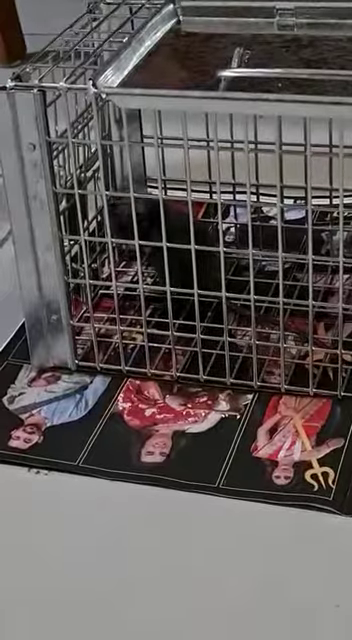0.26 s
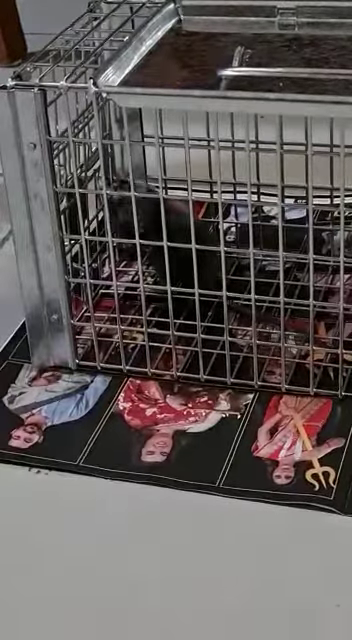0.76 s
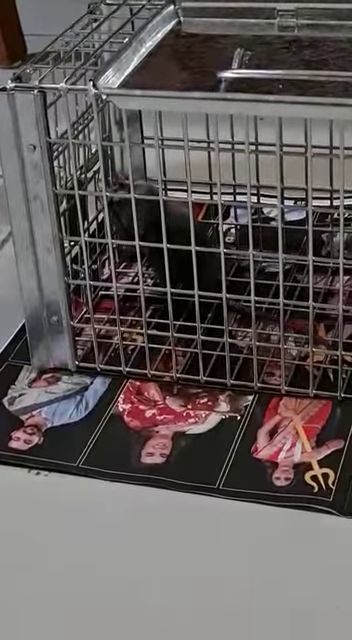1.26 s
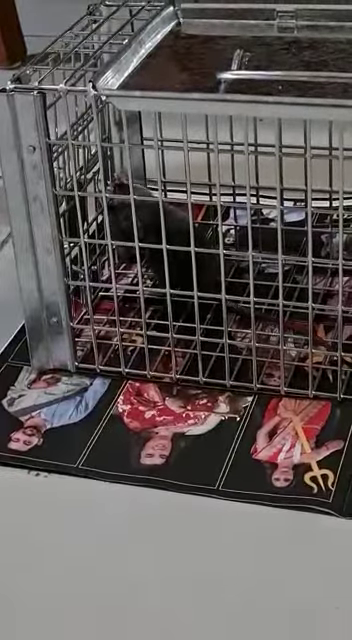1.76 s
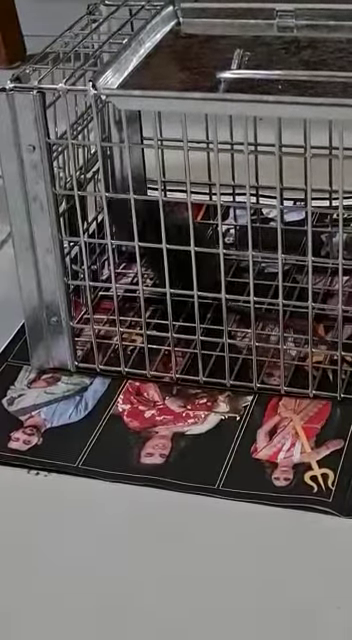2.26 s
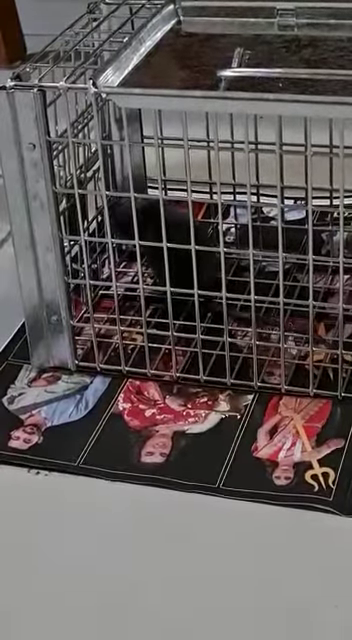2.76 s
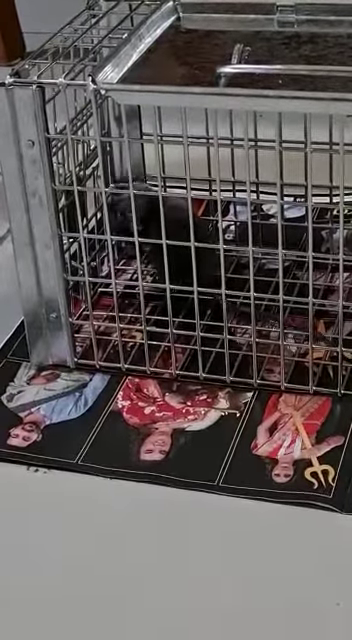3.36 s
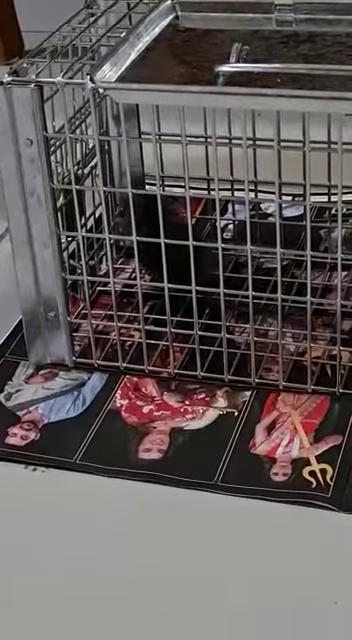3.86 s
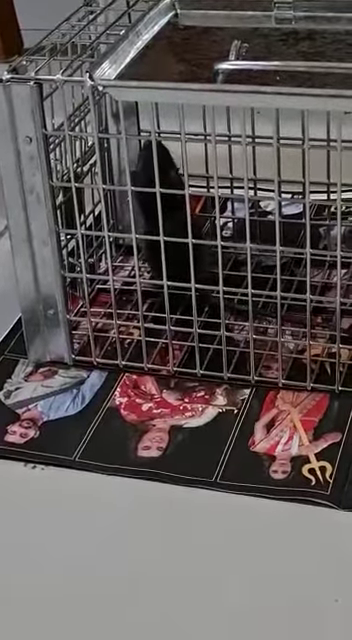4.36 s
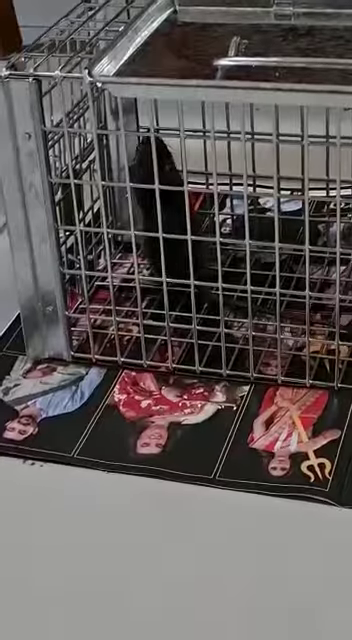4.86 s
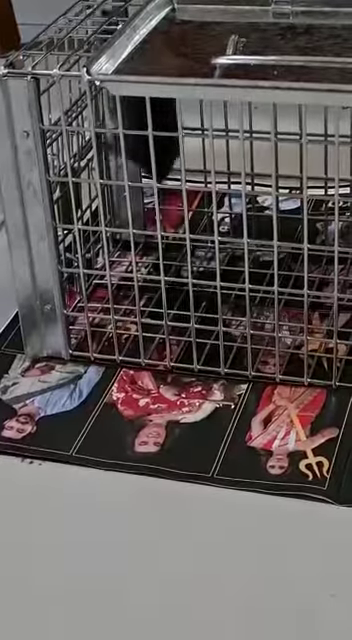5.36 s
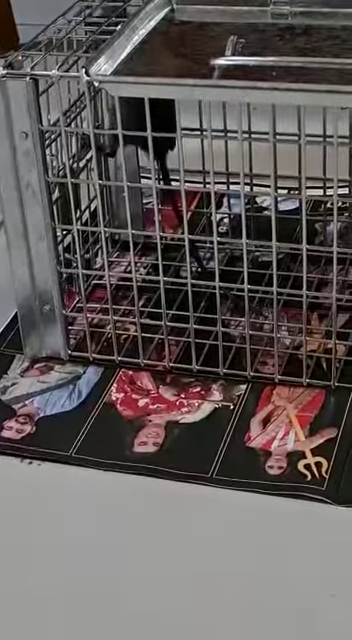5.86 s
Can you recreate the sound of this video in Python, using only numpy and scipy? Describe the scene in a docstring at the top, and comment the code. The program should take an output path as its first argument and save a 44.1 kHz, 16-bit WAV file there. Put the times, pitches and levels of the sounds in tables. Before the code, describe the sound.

A rat moves inside a steel wire cage trap, heard from nearby in a hard, bare room with a short echo. Soft steady room noise, a wavering low rumble and a faint hiss run throughout. A very faint, thin squeak comes at 0.2 seconds and soft paw scuffs around 1 second. Claws pluck the mesh at 1.3, 1.4 and 1.5 seconds: three sharp, ringing metal clacks, each louder, the third the loudest of all. A lighter clink follows at 1.9 seconds as a distant hum swells. After a lull with barely audible squeaks, a single clack sounds at 3.7 seconds. From 4.5 to 5.4 seconds comes a run of tiny dry ticks, about ten a second. A soft scuff leads into several thinner, higher wire clinks from 5.5 to 6 seconds, the strongest at about 5.8.

```python
"""A rat climbs about in a steel wire cage trap on the floor of a hard, bare room.
Its claws pluck the mesh: the wires snap back and ring, and the whole trap clacks.
In between come soft scuffs of its paws, thin squeaks and a run of small dry ticks.
Behind it are steady room noise, a low swelling rumble, a distant drone and a faint hiss and whine."""
import sys
import numpy as np
from scipy import signal
from scipy.fft import rfft, irfft, next_fast_len
from scipy.io import wavfile
from scipy.ndimage import uniform_filter1d, map_coordinates

SR = 44100
rng = np.random.default_rng(int(sys.argv[2]) if len(sys.argv) > 2 else 0)


def pcm_store(signal):
    """Save signal as 16-bit PCM."""
    levels = np.round(np.clip(np.atleast_2d(signal), -1, 1) * 32767)
    wavfile.write(sys.argv[1], SR, levels.astype(np.int16).T)


N = 270200
TIME = np.arange(N) / SR
AGE = np.arange(int(.6 * SR)) / SR  # seconds since one short sound began

# Claw strikes, each catching two crossing wires: (time [s], level [dB], frame [dB], wires [dB],
# sizzle [dB], first wire [Hz], its clink [dB], second wire [Hz], its clink [dB])
STRIKES = [(1.2608, -43, 0.5, -6.5, -9.5, 3245, -3.5, 5000, -6.5),
           (1.4216, -31.5, -5, -3, -2.5, 3170, -5.5, 5230, -8),
           (1.5007, -26.5, -5, -8.5, -1.5, 3110, -8, 1920, -16.5),
           (1.9014, -49, -5, 2.5, -3, 3320, 4.5, 5320, -5.5),
           (3.6637, -46, 5, -4, -6.5, 3520, -8, 7180, -4.5),
           (5.5187, -51, -31, -17, -14, 5900, -13, 8200, -13),
           (5.575, -61, -10, -6, -11, 5900, 0, 8200, -15.5),
           (5.777, -52, -11, -4.5, -8, 5730, -14, 8200, -11.5),
           (5.828, -39, -15.5, -17, -1.5, 5800, -14, 7760, -7),
           (6.078, -73, -19, -7, -7, 7400, 5, 8400, -2.5)]
# The notes at which the mesh wires ring: (pitch [Hz], level [dB])
WIRE_NOTES = [(1030, -12), (1560, -5), (1775, -5.5), (1902, -12), (2150, -7), (2505, -5), (2950, -5.5),
              (3101, 1), (3243, -5), (3378, -9), (3495, 1), (4830, -0.5), (5056, -11), (5320, -6.5),
              (5484, -6.5), (5730, -0.5), (6415, -8), (6630, -5), (6997, 1), (7230, 1), (7560, -6.5),
              (8200, -3.5), (8437, -7), (10900, -6)]
# The room's echo; "t60" is the time a sound takes to fade by 60 dB: (frequency [Hz], t60 [s])
ROOM_FADE = [(500, 0.17), (2000, 0.58), (3500, 0.42), (7000, 0.46), (10000, 0.34), (15000, 0.27)]


def claw_strikes(crack_db=3, jangle_db=1, wire_db=-17, wall_db=-4, tail_db=-6,
                 crack_t60=0.014, attack_s=.0004, wall_delay_s=.01):
    """A claw lets a wire snap back: a crack, jangling mesh, ringing wires and the room's echo."""
    # The dense jangle of the whole cage: (frequency [Hz], level [dB])
    cage_tone = [(300, -29), (600, -9), (1000, -8.5), (1450, 0), (2100, -5), (2400, 0), (3150, 3.5),
                 (3550, 3.5), (3850, -0.5), (4600, -1.5), (5300, -0.5), (8300, -1.5), (10200, -1.5),
                 (15500, -8)]
    out = np.zeros((2, N))
    wire_hz, level_db = np.transpose(WIRE_NOTES)
    wire_t60 = .8 * along(ROOM_FADE, wire_hz)
    ringing = np.exp(2j * np.pi * wire_hz[:, None] * AGE) * amp(-60 * AGE / wire_t60[:, None])
    for start, db, frame_db, ring_db, sizzle_db, *_ in STRIKES:
        peaks = ripple(depth_db=3.3, step_hz=120)
        jangle = lambda: noise(lambda hz: amp(along(cage_tone, hz)) * peaks(hz), len(AGE))
        hit = jangle() * amp(crack_db - 60 * AGE / crack_t60)
        hit += amp(jangle_db) * room_fade(jangle(), life=0.55)
        # the room's echo builds quickly, with one slap from a near wall
        hit += jangle() * echo(wall_db, wall_delay_s, t60=0.05)
        hit += amp(tail_db) * room_fade(jangle(), life=1) * fade_in(0.0066)
        # loose parts chatter, so the sound fades unevenly
        hit *= amp(1.5 * wobble(AGE * 300, points=200))
        strength = amp(wire_db + level_db + 2 * rng.standard_normal((2, len(wire_hz))))
        phase = rng.uniform(0, 2 * np.pi, (2, len(wire_hz)))
        hit += ((strength * np.exp(1j * phase)) @ ringing).imag  # add up all the wire notes
        hit *= fade_in(attack_s)
        # where the claw catches decides which parts of the cage are shaken
        contact = [(2250, frame_db), (2750, ring_db), (3650, ring_db), (4300, .7 * frame_db),
                   (5200, 0.0025), (8800, 0.011), (11500, sizzle_db)]
        add(out, start, amp(db) * filtered(hit, lambda hz: amp(along(contact, hz))))
    return out


def wire_clinks(width_hz=130, t60=0.19, attack_s=0.00048, blur_db=-2, reach_octaves=0.076, knock_db=-10):
    """Caught wires and those near in pitch ring and knock the frame; the welded mesh blurs the notes."""
    out = np.zeros((2, N))
    wire_hz, level_db = np.transpose(WIRE_NOTES)
    tones = np.exp(2j * np.pi * wire_hz[:, None] * AGE)
    frame = amp(knock_db + level_db) * (wire_hz < 2000)  # low notes belong to the sheet-metal frame

    def pluck(pitch_hz):
        """Share one pluck among the notes close to its pitch."""
        near = np.exp(-.5 * (np.log2(wire_hz / pitch_hz) / reach_octaves) ** 2)
        return near / (np.linalg.norm(near) + 1e-9)

    for start, db, frame_db, _, _, first_hz, first_db, second_hz, second_db in STRIKES:
        strength = amp(first_db) * pluck(first_hz) + amp(second_db) * pluck(second_hz)
        strength += amp(frame_db) * frame
        phase = rng.uniform(0, np.pi, (2, len(wire_hz)))
        clink = ((strength * np.exp(1j * phase)) @ tones).imag
        blur = lambda hz: strength @ np.abs(resonance(hz, wire_hz[:, None], width_hz)) ** 2
        clink += amp(blur_db) * np.linalg.norm(strength) * noise(blur, len(AGE))
        add(out, start, clink * amp(db - 60 * AGE / t60) * fade_in(attack_s))
    return out


def dry_ticks(tick_t60=0.0063, attack_s=.0003, tail_db=-25, gain_db=7,
              ring_hz=3550, ring_db=-25, ring_t60=0.25):
    """Tiny dry ticks, about ten a second, with one near echo, a faint wire ring and little room."""
    # The run of ticks: (time [s], level [dB], pitch [Hz], brightness [dB])
    ticks = [(4.548, -57, 7630, -0.5), (4.643, -62.5, 7800, -7), (4.750, -61, 6670, -12),
             (4.8443, -60, 6700, -26), (4.955, -48, 4600, -13), (5.051, -58.5, 4830, -39),
             (5.153, -59.5, 3470, -11), (5.258, -48, 5450, -9), (5.356, -47.5, 5600, -13)]
    bright_tone = [(1500, -24.5), (3000, 6.5), (8000, -9.5), (15000, -24.5)]
    out = np.zeros((2, N))
    for start, db, pitch_hz, bright_db in ticks:
        peaks = ripple(depth_db=2.5, step_hz=800)
        bass_cut = lambda hz: 1 / (1 + (2600 / (hz + 1)) ** 8)
        body = lambda hz: np.abs(resonance(hz, pitch_hz, 2800)) * peaks(hz) * bass_cut(hz)
        edge = lambda hz: body(hz) + amp(bright_db + along(bright_tone, hz))
        snap = amp(-60 * AGE / tick_t60) + echo(db=-19, delay_s=.007, t60=0.017)
        tick = panned(noise(edge, len(AGE)) * snap * fade_in(attack_s), right_db=2.5)
        tick += amp(tail_db) * room_fade(noise(body, len(AGE)), life=0.63)
        # the lower the tick, the more it stirs the wire
        ring = noise(lambda hz: resonance(hz, ring_hz, width_hz=450) ** 2, len(AGE))
        tick += (ring_hz / pitch_hz) ** 2 * ring * amp(ring_db - 60 * AGE / ring_t60)
        add(out, start, amp(db + gain_db) * tick)
    return out


def paw_scuffs():
    """A sliding paw rubs the wires and stirs their main notes, with no sharp start."""
    # Paws brushing the wires: (time [s], level [dB], width [s])
    scuffs = [(1.054, -75.5, 0.013), (1.09, -79, 0.034), (1.245, -73.5, 0.018), (3.1, -84, 0.044),
              (5.419, -71.5, 0.0053), (5.451, -67.5, 0.022)]
    wires = lambda hz: (resonance(hz, 3170, 420) - 0.56 * resonance(hz, 5250, 530)
                        + 0.26 * resonance(hz, 7400, 1600))
    return swells(scuffs) * noise(wires, N)


def thin_squeaks(width_hz=260):
    """Faint, high whistles, each a narrow band of noise that rises and falls."""
    # The squeaks: (time of peak [s], level [dB], pitch [Hz], width [s])
    squeaks = [(0.232, -82, 5310, 0.012), (0.853, -91, 7900, .015), (2.302, -92, 7300, .012),
               (3.065, -92, 8170, 0.025), (3.103, -96.5, 7770, .015), (5.096, -87.5, 7700, .012)]
    out = np.zeros((2, N))
    for peak_s, db, pitch_hz, width_s in squeaks:
        tone = noise(lambda hz: resonance(hz, pitch_hz, width_hz) ** 2, len(AGE))
        swell = np.exp(-.5 * (AGE / width_s - 2) ** 2)
        add(out, peak_s - 2 * width_s, amp(db) * tone * swell)
    return out


def room_noise(start_db=-56.5, db_per_s=-0.374):
    """The soft, even rush of the room, slowly easing off."""
    # The tone of the room's air: (frequency [Hz], level [dB])
    air_tone = [(25, -8), (45, 0.5), (65, 0.5), (105, 3.5), (150, -8), (200, -1.5), (300, -10), (420, -17),
                (780, -12), (1150, -16.5), (1750, -17), (2400, -32.5), (4500, -43.5), (9000, -68.5)]
    peaks = ripple(depth_db=1.3, step_hz=22)
    return amp(start_db + db_per_s * TIME) * noise(lambda hz: amp(along(air_tone, hz)) * peaks(hz), N)


def low_rumble(start_db=-57, db_per_s=0.27, waver_db=2):
    """A deep rumble that wavers, grows slowly and swells now and then."""
    # The tone of the rumble: (frequency [Hz], level [dB])
    rumble_tone = [(12, -30.5), (24, -17.5), (34, -3.5), (48, 3.5), (58, -10), (75, -33.5), (200, -77.5)]
    # Its swells: (time [s], level [dB], width [s])
    rumble_swells = [(2.13, -55, 0.11), (2.95, -60, 0.17), (4.05, -56, 0.26), (5.12, -45, 0.043),
                     (5.43, -50.5, 0.056), (5.85, -57.5, 0.22)]
    deep = noise(lambda hz: amp(along(rumble_tone, hz)), N)
    power = uniform_filter1d(np.mean(deep ** 2, axis=0), size=SR // 12)
    deep /= np.sqrt(np.abs(power) + 1e-6)  # even out the noise's own ups and downs
    resting = amp(start_db + db_per_s * TIME + waver_db * wobble(TIME * 7, points=400))
    return (resting + swells(rumble_swells)) * deep


def distant_drone(resting_db=-74.5):
    """A low, far-off hum that swells twice."""
    # Its swells: (time [s], level [dB], width [s])
    drone_swells = [(1.85, -57.5, 0.26), (3.55, -66, 0.15)]
    hum = noise(lambda hz: resonance(hz, centre_hz=128, width_hz=31) ** 2, N)
    return (amp(resting_db) + swells(drone_swells)) * hum


def hiss_and_whine(hiss_db=-87, whine_db=-105):
    """Microphone hiss and a faint electrical whine."""
    # The tone of the hiss: (frequency [Hz], level [dB])
    hiss_tone = [(1500, -7.5), (4000, -5.5), (5500, 7), (6200, -1), (6900, -7), (8200, -3.5), (10000, -5),
                 (12000, 1), (16000, -2.5)]
    hiss = amp(hiss_db) * noise(lambda hz: amp(along(hiss_tone, hz)), N)
    whine = amp(whine_db) * noise(lambda hz: resonance(hz, centre_hz=8812, width_hz=70), N)
    return hiss + whine


def amp(db):
    """Turn decibels into a number to multiply a sound by."""
    return 10 ** (np.asarray(db) / 20)


def along(points, hz):
    """Read between (frequency, value) points, with every octave equally wide."""
    point_hz, values = np.transpose(points)
    return np.interp(np.log(hz + 1), np.log(point_hz + 1), values)


def filtered(x, response):
    """Turn each frequency of x up or down by response(hz)."""
    size = x.shape[-1]
    padded = next_fast_len(size + 8192)
    hz = np.fft.rfftfreq(padded, 1 / SR)
    return irfft(rfft(x, padded) * response(hz), padded)[..., :size]


def resonance(hz, centre_hz, width_hz):
    """How a ringing thing answers each frequency: fully at its centre, less to either side."""
    return 1j * hz * width_hz / (centre_hz ** 2 - hz ** 2 + 1j * hz * width_hz)


def noise(response, size):
    """Shaped stereo noise of average power 1; left and right are alike in the bass only."""
    # How alike the two sides are: (frequency [Hz], likeness [0 to 1])
    likeness = [(60, 0.93), (160, 1), (320, .6), (600, 0.56), (1500, 0), (3000, 0.11), (5000, 0)]
    angle = lambda hz: np.arccos(np.clip(along(likeness, hz), -1, 1)) / 2
    shares = lambda hz: np.array([np.cos(angle(hz)), np.sin(angle(hz))])
    mid, side = filtered(rng.standard_normal((2, size)), lambda hz: response(hz) * shares(hz))
    pair = np.array([mid + side, mid - side])
    return pair / np.sqrt(np.mean(pair ** 2) + 1e-20)


def add(out, start_s, sound):
    """Mix a sound into out at the given time."""
    start = max(round(start_s * SR), 0)
    part = out[:, start:start + sound.shape[1]]
    part += sound[:, :part.shape[1]]


def panned(x, right_db):
    """Lean a stereo sound to the right."""
    return x * amp([[-right_db / 2], [right_db / 2]])


def fade_in(rise_s):
    """A level that climbs from 0 towards 1."""
    return 1 - np.exp(-AGE / rise_s)


def echo(db, delay_s, t60):
    """The level of one echo: silent until it arrives, then fading."""
    return amp(db - 60 * np.abs(AGE - delay_s) / t60) * (AGE > delay_s)


def room_fade(x, life):
    """Fade x as the room does, the middle pitches lasting longest; life scales the fade time."""
    hz, seconds, spectrum = signal.stft(x, SR, nperseg=256)
    t60 = life * along(ROOM_FADE, hz)[:, None]
    return signal.istft(spectrum * amp(-60 * seconds / t60), SR, nperseg=256)[1][:, :len(AGE)]


def ripple(depth_db, step_hz):
    """Random peaks and gaps across the frequencies, as left by many overlapping notes."""
    heights = rng.standard_normal(400)
    return lambda hz: amp(depth_db * (map_coordinates(heights, [hz / step_hz], mode="mirror") - 3.0))


def swells(rows):
    """A smooth rise and fall for each (time [s], level [dB], width [s]) row."""
    return sum(amp(db) * np.exp(-.5 * ((TIME - peak_s) / width_s) ** 2) for peak_s, db, width_s in rows)


def wobble(position, points):
    """A smooth curve through random points, one at each whole step of position."""
    return map_coordinates(rng.standard_normal(points), [position], mode="mirror")


def scene():
    """The rat in its cage, over the room's background."""
    rat = claw_strikes() + wire_clinks() + dry_ticks() + paw_scuffs() + thin_squeaks()
    room = panned(room_noise() + low_rumble() + distant_drone(), right_db=1.8)
    return rat + room + hiss_and_whine()


def record(dry, top_hz=15850):
    """Cut off the very highest treble."""
    return filtered(dry, lambda hz: 1 / (1 + (hz / top_hz) ** 200))


dry = scene()
out = record(dry)
pcm_store(out)
```